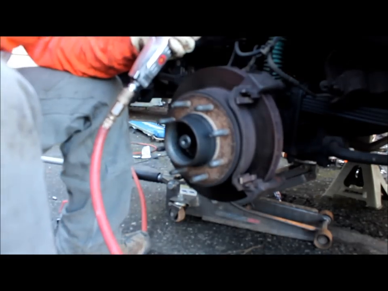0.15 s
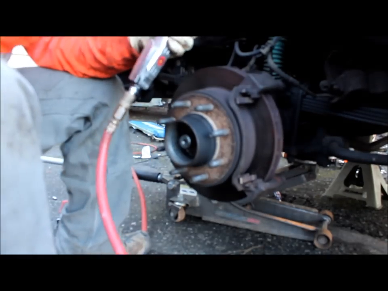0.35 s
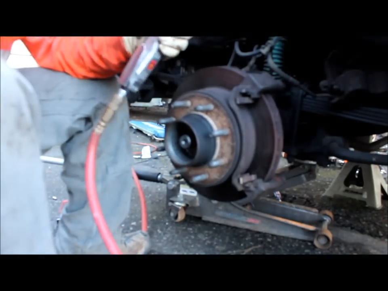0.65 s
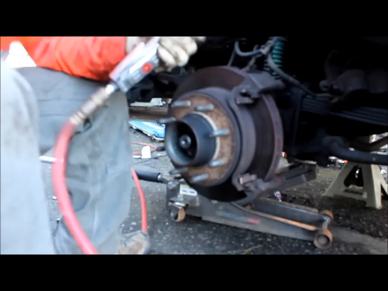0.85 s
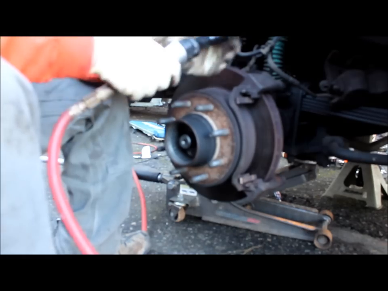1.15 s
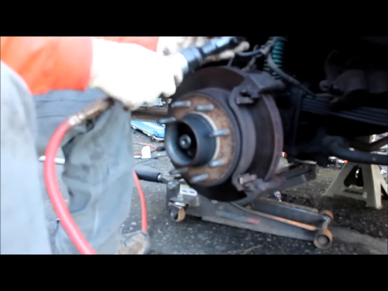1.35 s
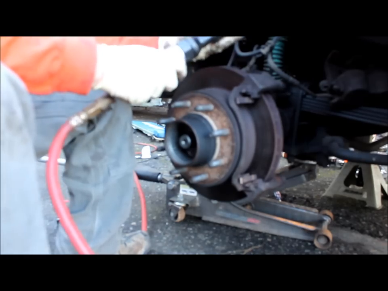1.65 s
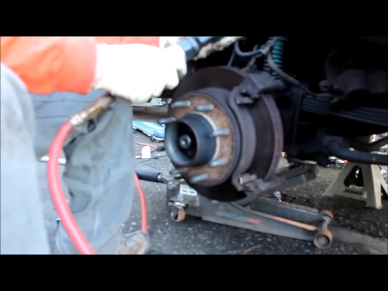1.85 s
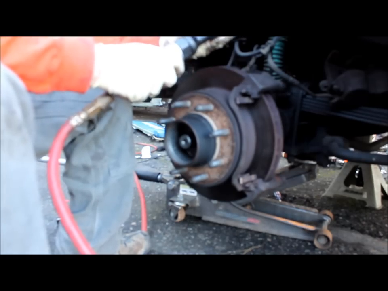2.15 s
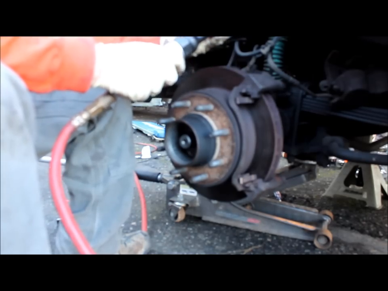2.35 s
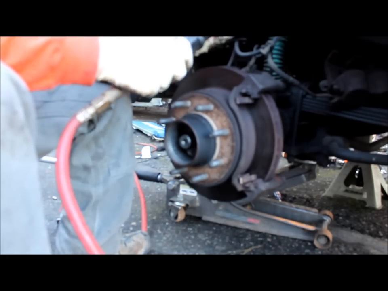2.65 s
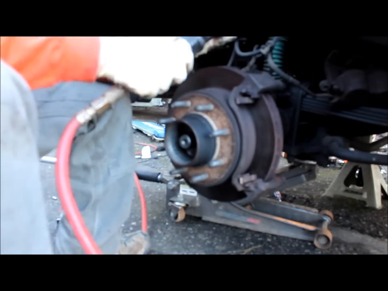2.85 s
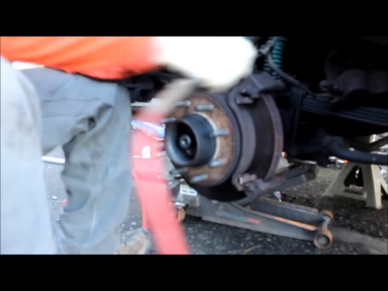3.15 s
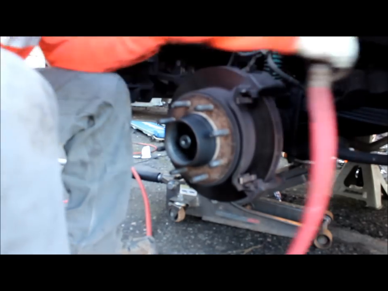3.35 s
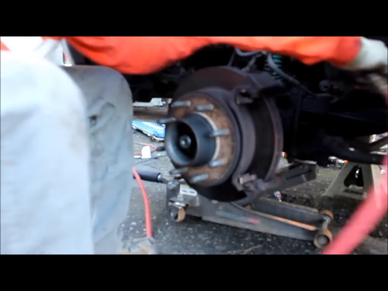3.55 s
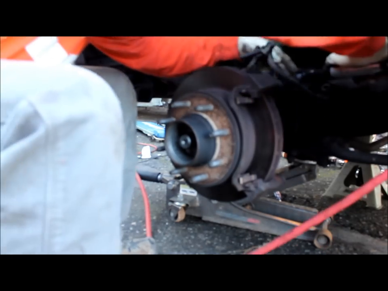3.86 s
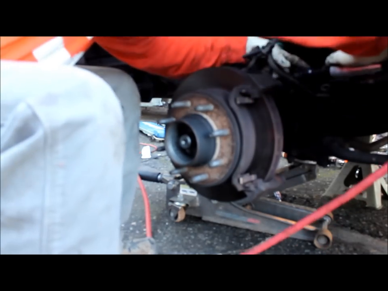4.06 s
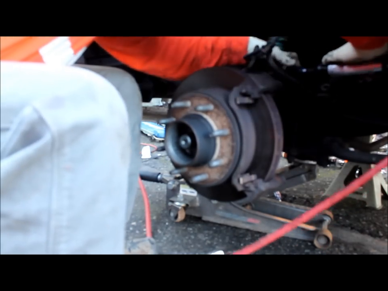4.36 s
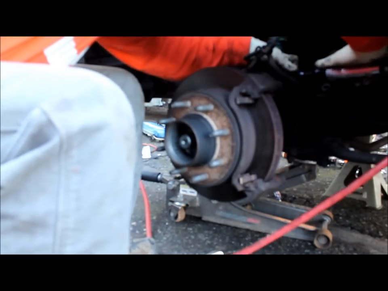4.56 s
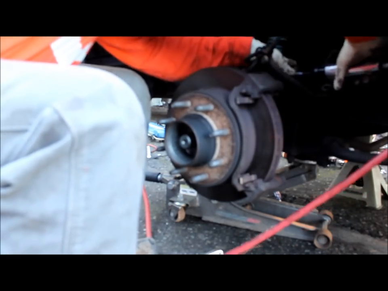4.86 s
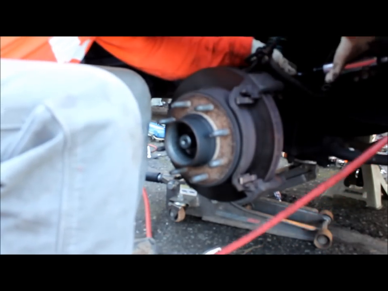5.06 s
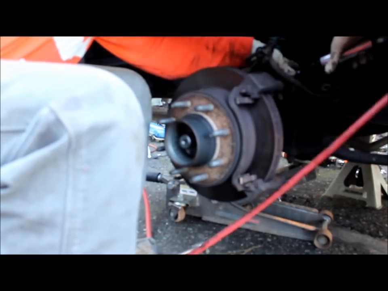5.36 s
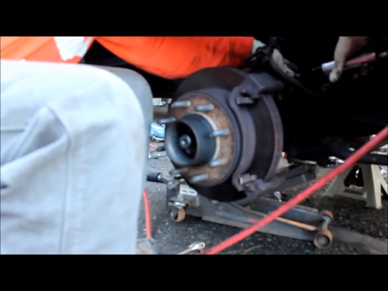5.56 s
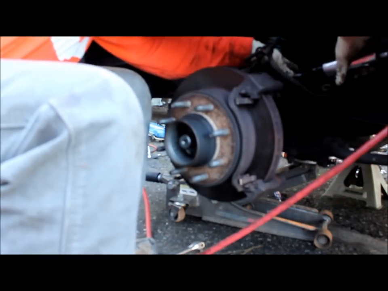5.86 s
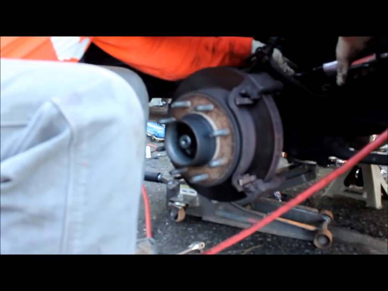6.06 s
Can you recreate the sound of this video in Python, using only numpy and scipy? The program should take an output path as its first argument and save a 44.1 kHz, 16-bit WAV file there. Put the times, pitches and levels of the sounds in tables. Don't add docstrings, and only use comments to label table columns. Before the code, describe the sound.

Steady loud air-hose hiss up close, two short air ratchet whines, a burst of metal clanks and hub ringing, two more blips, then sudden silence.

```python
import sys
import numpy as np
from scipy import signal
from scipy.fft import rfft, irfft, next_fast_len
from scipy.io import wavfile
from scipy.ndimage import uniform_filter1d, map_coordinates

SR = 44100
rng = np.random.default_rng(int(sys.argv[2]) if len(sys.argv) > 2 else 0)


def materialize(psi):
    bounded = np.clip(np.atleast_2d(psi).T, -1, 1)
    quanta = np.round(bounded * 32767).astype(np.int16)
    wavfile.write(sys.argv[1], SR, quanta)


def convert_level_to_amplitude(level_db):
    exponent = np.asarray(level_db, float) / 20
    return 10 ** exponent


N = 274294
T = np.arange(N) / SR

# frequency in Hz, density in dB per Hz.
YARD_SPECTRUM = [(15, -59.5), (25, -26.5), (38, -21.5), (57, -16.5), (75, -9.5), (179, -11), (232, -14),
                 (437, -17.5), (476, -19), (796, -19), (1500, -28.5), (1950, -47), (3300, -120)]
# time in seconds, low hum in dB.
ENGINE_HUM = [(0.0, -48.5), (0.37, -48.5), (0.58, -37), (0.88, -48), (1.378, -60), (1.64, -47.5),
              (1.9, -40.5), (2.3, -36.5), (2.778, -33.5), (3.318, -39.5), (3.6, -48), (3.8, -32),
              (4.0, -38), (4.3, -42), (4.512, -41.5), (4.8, -33), (5.26, -45.5), (5.5, -40.5)]
# time in seconds, level in dB.
SIDE_BANDS = [(.155, -50), (.55, -33), (1.155, -33.5), (1.505, -48.5), (2.945, -32), (3.18, -48),
              (3.245, -29.5), (3.985, -34), (4.195, -31.5), (4.545, -42), (4.635, -36)]

# time in seconds, flow in dB, whistle in Hz, whistle in dB.
LEAK_FLOW = [(0.0, -18.5, 6200, 4.5), (0.388, -17, 6540, -3), (0.766, -16, 6400, 4), (0.89, -17, 6260, 6.5),
             (1.004, -15.5, 7400, 5), (1.104, -22, 6930, 3.5), (1.268, -21.5, 7050, 0.5),
             (1.64, -21.5, 6500, 3), (1.96, -18.5, 6900, -4.5), (2.36, -20, 7070, -0.5),
             (3.042, -20, 6910, 0), (3.492, -18.5, 7200, 1.5), (3.95, -22.5, 7000, 3.5),
             (4.41, -21.5, 6900, -1), (4.576, -21, 6860, 0), (4.96, -23, 6600, 4), (5.468, -21, 7240, -0.5)]
# frequency in Hz, density in dB per Hz.
JET_SPECTRUM = [(530, -22.5), (900, -11.5), (1090, -11), (1580, -10.5), (2150, -10), (2370, -9),
                (2570, -11), (3040, -7), (3600, -6), (3860, -5), (5210, -4), (7630, -2.5), (9930, -3),
                (13400, 2), (15600, -1)]
# frequency in Hz, width in Hz, level in dB.
BANDS_NEAR = [(3460, 180, -9), (4364, 130, 1.5), (5670, 82, 2), (6120, 270, -2), (6960, 110, -0.5),
              (8900, 270, -5)]
# frequency in Hz, width in Hz, level in dB.
BANDS_AWAY = [(3900, 76.6, -3), (4260, 72, 1), (5200, 56, -10), (5360, 130, -0.5), (6230, 170, -4),
              (6760, 64, -0.5), (7670, 91, 6), (13300, 68, -7.5)]

# frequency in Hz, level in dB, 60 dB decay in seconds.
HUB_MODES = [(229.2, 7, 0.14), (731, 0.5, 0.13), (1160, 5, 0.064), (1620, 13, 0.047), (2640, -11, 0.32),
             (2890, 1, 0.14), (3150, -9.5, 0.11), (3820, -8, 0.13), (4930, -11.5, .15), (5950, -11.5, 0.3),
             (7320, -12.5, 0.38), (7000, -9, 0.32), (8100, -12.5, .2), (8700, -17, .25)]
# time in seconds, level in dB.
HUB_BLOWS = [
    (3.732, -13.5),
    (3.76, -19.5),
    (4.453, -28.5),
]

# time in seconds, peak in dB, ring in Hz, thud in dB.
COUPLING = [
    (0.4048, -8, 1920, -36),
    (0.4472, -12.5, 1900, -27.5),
    (0.6945, 0, 2500, -33),
]
SPIT = [
    (1.078, -13.5, 2310, -22.5),
]
TRIGGER = [
    (2.0643, -18, 1225, 9),
    (2.27, -17.5, 2740, -9.5),
    (4.9653, -15.5, 3020, -11),
    (5.5766, -6, 1200, -19.5),
    (5.691, -8.5, 1215, -20.5),
]
SOCKET = [
    (3.3483, -5, 2000, -21.5),
    (3.3855, -7.5, 2030, -20.5),
    (3.4555, -24.5, 2540, -26),
    (3.4993, -3.5, 2120, -10),
    (3.5537, -10.5, 1350, -5.5),
    (3.578, -7, 2150, -20.5),
    (3.6965, 2.5, 2160, -11),
]
AXLE = [
    (3.7333, 0.5, 1310, -8.5),
    (3.7443, -5, 2950, -6.5),
    (3.7575, -10, 1640, -8),
    (3.7714, -11, 2884, -2),
    (3.7875, -4, 1300, -8.5),
    (3.819, -20.5, 2550, -16.5),
    (3.8482, -17, 1580, -1),
]
RATTLE = [
    (3.8653, -11, 1560, -20.5),
    (3.893, -10, 1620, -26.5),
    (3.92, -12, 1400, -28),
    (4.0642, -27, 1290, -18.5),
]
SEATING = [
    (4.4254, -2, 2094, -12.5),
    (4.4535, -2.5, 1167, -13),
    (4.4634, -11, 2820, -16),
    (4.4794, -15.5, 2830, -7),
    (4.5192, -21, 2010, -10.5),
    (4.8044, -16.5, 2130, -18),
    (4.8199, -24.5, 3240, 4),
]
STOPS = [
    (2.3109, -7, 3080, -19),
    (5.1731, -10, 2080, -4.5),
]
# contacts, upper ring in Hz, upper ring in dB, sizzle of a full blow in dB, more sizzle per dB softer.
PARTS = [(COUPLING, 6200, -3.5, 0, .1), (SPIT, 14300, 5, -2, .1), (TRIGGER, 3300, -2, -11.5, .6),
         (SOCKET, 4700, -6, -10.5, .35), (AXLE, 3750, -2, -26.5, .9), (RATTLE, 4300, -2, -13, .3),
         (SEATING, 5800, -5.5, -9.5, .15), (STOPS, 6400, 0, 3.4, .1)]

# valve opens, rotor starts, release and rotor stops in seconds, top vane rate in Hz.
BLIPS = [
    (1.647, 1.6515, 1.770, 1.906, 1395),
    (2.064, 2.067, 2.193, 2.312, 1410),
    (4.964, 4.978, 5.086, 5.2, 1410),
    (5.576, 5.58, 5.663, 5.8, 1012),
]
# driven whine in dB, exhaust in dB, coasting in dB, coasting fade in dB/s,
# driven first order in dB.
EFFORT = [
    (-12, -14.5, -10, 69.5, -0.5),
    (-15.5, -14, -8.5, 71, 1.5),
    (-12.5, -16, -6.5, 132.5, -9),
    (-14.5, -15.5, -8.5, 60.5, -1.5),
]
# frequency in Hz, width in Hz, level in dB.
HOUSING_MODES = [(350, 270, -4.5), (980, 240, 4), (1350, 800, -1), (1668, 100, 7), (2150, 340, 0),
                 (2694, 390, 5), (2864, 190, 5.5), (4040, 420, 1), (5550, 180, -3.5)]
# frequency in Hz, density in dB per Hz.
EXHAUST_SPECTRUM = [(350, -54), (600, -28.5), (1360, -7.5), (1970, -6), (2690, -12), (3040, -5), (4000, -2),
                    (4840, -5.5), (5540, -3), (15600, -12)]
# frequency in Hz, width in Hz, level in dB.
MUFFLER_MODES = [(383, 240, -7), (750, 86, 8), (1160, 340, 6)]
# frequency in Hz, width in Hz, level in dB.
MUFFLER_BEHIND = [(440, 180, -8), (690, 88, -1.5), (980, 270, 4.5)]
# frequency in Hz, width in Hz, level in dB.
PAWL_MODE = [(9140, 600, 9.5)]


def unit(x):
    return x / np.sqrt(np.mean(x ** 2) + 1e-20)


def along(points, hz):
    f, v = np.transpose(points)
    return np.interp(np.log(hz + 1), np.log(f + 1), v)


def curves(rows, t):
    s, *cols = np.transpose(rows)
    return [np.interp(t, s, c) for c in cols]


def since(start_s):
    return np.clip(T - start_s, 0, 1)


def wobble(rate):
    knots = rng.standard_normal(int(N * rate / SR) + 4)
    return map_coordinates(knots, [T * rate])


def filtered(x, response):
    m = next_fast_len(len(x) + 8192)
    return irfft(rfft(x, m) * response(np.fft.rfftfreq(m, 1 / SR)), m)[:len(x)]


def noise(spectrum):
    return unit(filtered(rng.standard_normal(N), lambda hz: convert_level_to_amplitude(along(spectrum, hz))))


def mode(f, hz, width):
    return 1j * f * width / (hz * hz - f * f + 1j * f * width)


def resonant(x, modes):
    return filtered(x, lambda f: sum((-1) ** k * convert_level_to_amplitude(db) * mode(f, hz, width)
                                     for k, (hz, width, db) in enumerate(modes)))


def engine_tone(hz):
    phase = 2 * np.pi * np.cumsum(hz * (1 + .025 * wobble(9))) / SR
    return np.sqrt(2) * np.sin(phase) * convert_level_to_amplitude(2.2 * wobble(30))


def yard():
    settles_s, settle_time_s = 1.6, .1
    low_db, = curves(ENGINE_HUM, T)
    settled = (1 + np.tanh((T - settles_s) / settle_time_s)) / 2
    upper_db = -40.5 - 14.5 * settled + 3 * wobble(4.5)
    rumble = convert_level_to_amplitude(-36.5 + 1.1 * wobble(4)) * noise(YARD_SPECTRUM)
    return convert_level_to_amplitude(low_db) * engine_tone(74.2) + convert_level_to_amplitude(upper_db) * engine_tone(91) + rumble


def garage(x):
    t = np.arange(SR // 4) / SR
    tail = rng.standard_normal(len(t)) * convert_level_to_amplitude(-60 * t / 0.33) * (t > .004)
    return signal.fftconvolve(x, tail / np.linalg.norm(tail))[:N]


def side_bands():
    side, width = np.zeros(N), 2048
    lowest_hz, highest_hz, band_hz = 3960, 14200, 1500
    fall_db = 9
    heights = rng.uniform(0, 1, (len(SIDE_BANDS), 3))
    for (s, db), row in zip(SIDE_BANDS, heights):
        places = (np.arange(len(row)) + row) / len(row)
        for low_hz in lowest_hz + (highest_hz - lowest_hz) * places:
            band = filtered(rng.standard_normal(width), lambda hz: (hz > low_hz) & (hz < low_hz + band_hz))
            gain = convert_level_to_amplitude(db + 7 - fall_db * np.log2(low_hz / lowest_hz))
            side[round(s * SR) - width // 2:][:width] += gain * unit(band) * np.hanning(width) ** 2
    return side


def jet_bands(hz, bands):
    return sum((db + 5.0).clip(0) * np.exp(-((hz - centre) / width) ** 2) for centre, width, db in np.array(bands))


def smooth_noise(shape, bins, frames):
    patches = uniform_filter1d(rng.standard_normal(shape), size=bins, axis=0)
    return unit(uniform_filter1d(patches, size=frames, axis=1))


def leak():
    usual_flow_db, tilt_s, sag_db, refill_s = -20.5, 1.3, 7.5, .075
    hz, t, z = signal.stft(noise(JET_SPECTRUM), SR, nperseg=512)
    hz = hz[:, None]
    hiss_db, whistle_hz, whistle_db = curves(LEAK_FLOW, t)
    top_db = -33 + .6 * (hiss_db - usual_flow_db)
    low_db = -32.5 + .1 * (hiss_db - usual_flow_db)
    top = 1 / (1 + (9700 / (hz + 1)) ** 14)
    low = 1 / (1 + (hz / 3900) ** 10)
    sag = sum((t > valve) * np.exp(-(np.clip(t - release, 0, 1) / refill_s) ** 2)
              for valve, _, release, *_ in BLIPS)
    colour_db = hiss_db - sag_db * sag * (1 - low) + 1.5
    colour_db = colour_db + top * (top_db - hiss_db + 1.5) + low * (low_db - hiss_db + 12)
    whistle = whistle_db * np.exp(-((hz - whistle_hz) / 450) ** 2)
    whistle = whistle + np.where(t < tilt_s, .7 * jet_bands(hz, BANDS_NEAR), 0.53 * jet_bands(hz, BANDS_AWAY))
    patches_db = 1.9 * smooth_noise(z.shape, 4, 50) + .7 * smooth_noise(z.shape, 12, 8)
    jet = signal.istft(z * convert_level_to_amplitude(colour_db + whistle + patches_db), SR, nperseg=512)[1][:N]
    return jet * convert_level_to_amplitude(1.1 * wobble(14))


def hub():
    out, t = np.zeros(N), np.arange(SR // 3) / SR
    for s, db in HUB_BLOWS:
        ring = sum(convert_level_to_amplitude(level + rng.normal(0, 1.5) - 60 * t / life) * np.sin(2 * np.pi * hz * t)
                   for hz, level, life in HUB_MODES)
        out[round(s * SR):][:len(t)] += convert_level_to_amplitude(db) * ring * (1 - np.exp(-t / 0.00058))
    return out


def crack(t):
    bounces = rng.uniform(0, 1, (3, 2)) * [.016, 1.4] + [.003, 1.2]
    shape = convert_level_to_amplitude(-60 * t / 0.0046) + 0.55 * convert_level_to_amplitude(-60 * t / 0.03) + 0.08 * convert_level_to_amplitude(-60 * t / 0.081)
    for at, softness in bounces:
        shape = shape + convert_level_to_amplitude(-9 * softness - 60 * (t - at) / 0.024) * (t > at)
    return np.pad(shape * (1 - np.exp(-t / 0.00046)), (128, 0))[:len(t)]


def knocks():
    out, t = np.zeros(N + SR), np.arange(SR // 5) / SR
    f = np.fft.rfftfreq(len(t), 1 / SR)
    low = f ** 4 / (f ** 4 + 200 ** 4) / (1 + (f / 1200) ** 4)
    high = 1 / (1 + (5000 / (f + 1)) ** 6)
    middle = (1 - low - high).clip(0) * (f > 900)
    for contacts, upper_hz, upper_db, full_db, softer in PARTS:
        for s, db, ring_hz, thud_db in contacts:
            sizzle_db = full_db - softer * db
            thud = (low + 3 * mode(f, rng.uniform(520, 650), 37)) * convert_level_to_amplitude(thud_db + 14.5)
            upper = 3.3 * mode(f, upper_hz * rng.uniform(.92, 1.08), 260) * convert_level_to_amplitude(upper_db)
            colour = thud + middle + high * convert_level_to_amplitude(sizzle_db - 3.5) + 1.92 * mode(f, ring_hz, 330) + upper
            shape = crack(t)
            blow = unit(irfft(rfft(rng.standard_normal(len(t)) * shape) * colour, len(t)))
            level = convert_level_to_amplitude(db) * np.sqrt(np.mean(shape ** 2) * np.mean(np.abs(colour) ** 2))
            out[round(s * SR) - 128:][:len(t)] += level * blow
    return out[:N]


def vane_rate(start, release, top_hz):
    bite_s, bite_hz, bite_length_s = 5.63, 75, .008
    rise = top_hz * np.tanh(np.clip(np.minimum(T, release) - start, 0, 1) / .033)
    rise -= bite_hz * np.exp(-((T - bite_s) / bite_length_s) ** 2)
    return 80 + (rise - 80) * np.exp(-since(release) / .047)


def ratchet():
    moved_s = 3.5
    eased = 1 - 0.68 * np.clip((T - 5.642) / .006, 0, 1)
    driven, coasting, roar = np.zeros(N), np.zeros(N), np.zeros(N)
    air, grit = noise(EXHAUST_SPECTRUM), rng.standard_normal(N)
    chug = noise([(100, -31.5), (170, -7.5), (500, 0.0), (900, -14.5)])
    flutter = 1 + 0.012 * wobble(300)
    shimmer = [convert_level_to_amplitude(3 * wobble(110)) for k in range(6)]

    def orders(phase, fall_db):
        return sum(convert_level_to_amplitude(fall_db * np.log2(k)) * shimmer[k - 1] * np.cos(k * phase) for k in range(1, 7))

    for blip, effort in zip(BLIPS, EFFORT):
        valve, start, release, stop, top_hz = blip
        whine_db, roar_db, coast_db, fade_db, first_db = effort
        phase = 2 * np.pi * np.cumsum(vane_rate(start, release, top_hz) * flutter) / SR
        pressure = np.clip((T - valve) / .004, 0, 1) * np.exp(-(since(release) / .01) ** 2)
        turning = np.clip((T - start) / .004, 0, 1) * np.clip((stop - T) / 0.0064, 0, 1)
        vanes = turning * (1 + 0.17 * np.cos(phase / 6) + .15 * np.cos(phase / 3))
        surge = np.exp(-since(start) / 0.075)
        whine = orders(phase, -3.5) + (convert_level_to_amplitude(first_db) - 1) * np.cos(phase)
        driven += convert_level_to_amplitude(whine_db + 4.9 * surge) * pressure * vanes * whine
        driven += convert_level_to_amplitude(whine_db - 5.0) * pressure * turning * surge ** 2 * chug
        leftover = convert_level_to_amplitude(coast_db - fade_db * since(release)) * (T > release) * (1 - pressure) * vanes
        coasting += leftover * (orders(phase, -6.5) + 0.24 * grit * (1 + np.cos(phase)))
        roar += convert_level_to_amplitude(roar_db + surge) * pressure * (1 + .5 * np.cos(phase)) * air * eased
    coasting = filtered(coasting, lambda f: 1 / (1 + (f / 1450) ** 6))
    in_front = resonant(coasting * (T < moved_s), MUFFLER_MODES)
    coasting = in_front + resonant(coasting * (T > moved_s), MUFFLER_BEHIND)
    clicks = grit * convert_level_to_amplitude(-8.5 + 2.3 * wobble(40)) * np.abs(coasting)
    pawl = resonant(clicks + 0.33 * roar, PAWL_MODE)
    return resonant(driven + convert_level_to_amplitude(-30) * roar, HOUSING_MODES) + coasting + roar + pawl


def scene():
    tool = convert_level_to_amplitude(0.5) * ratchet() + convert_level_to_amplitude(0.5) * knocks() + hub()
    mid = tool + convert_level_to_amplitude(-7.5) * garage(tool) + leak() + yard()
    side = side_bands()
    return np.array([mid + side, mid - side])


def band_limit(x):
    return signal.sosfilt(signal.butter(12, 15780, fs=SR, output="sos"), x)


def record(dry):
    end_s, top_hz, threshold = 5.7125, 15800, convert_level_to_amplitude(2 * -14)
    keep = np.exp(-1 / (0.02 * SR))
    power = signal.lfilter([1 - keep], [1, -keep], np.mean(dry ** 2, axis=0))
    gain = (1 + power / threshold) ** -.45
    bass = filtered(dry.mean(axis=0), lambda hz: 1 / (1 + (hz / 330) ** 4))
    slow = signal.lfilter([1 - keep], [1, -keep], power)
    bass_gain = 0.17 + 0.71 / (1 + (slow / threshold) ** 2.6)
    x = (dry + bass * (bass_gain - 1)) * gain * convert_level_to_amplitude(1.91)
    x = x / (1 + np.abs(x / 1.1) ** 8) ** (1 / 8)
    x = np.array([filtered(channel, lambda hz: hz < top_hz) for channel in x])
    return band_limit(x * (T < end_s))


dry = scene()
out = record(dry)
materialize(out)
```